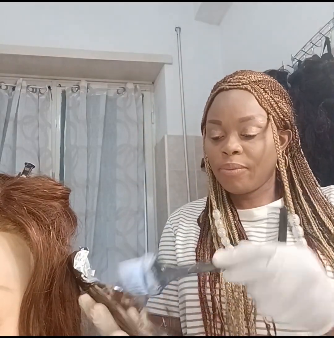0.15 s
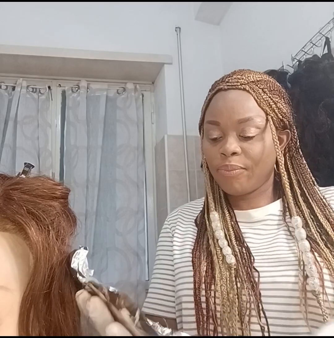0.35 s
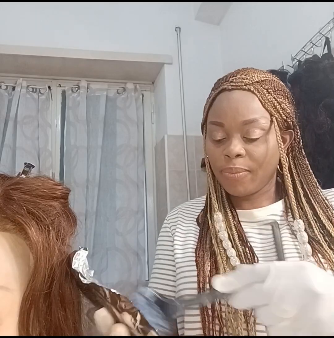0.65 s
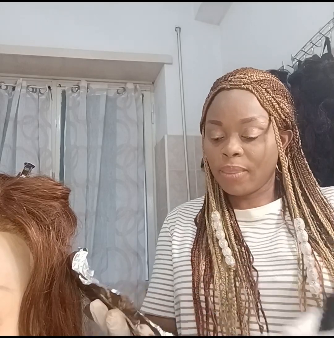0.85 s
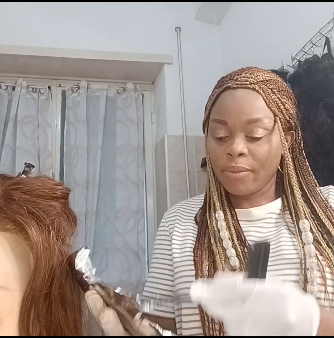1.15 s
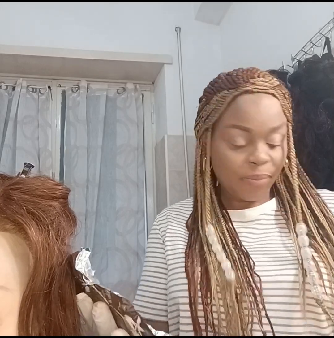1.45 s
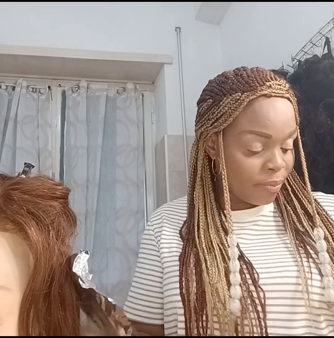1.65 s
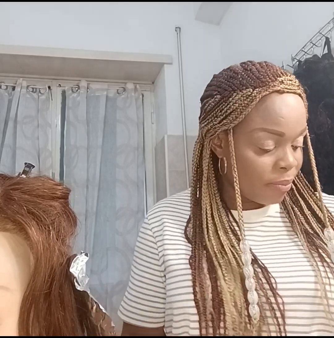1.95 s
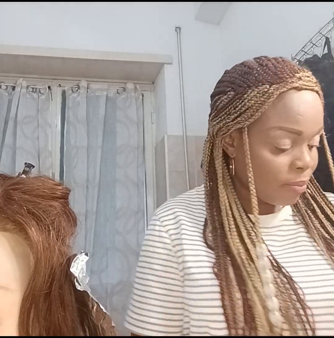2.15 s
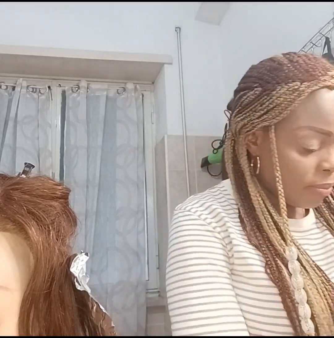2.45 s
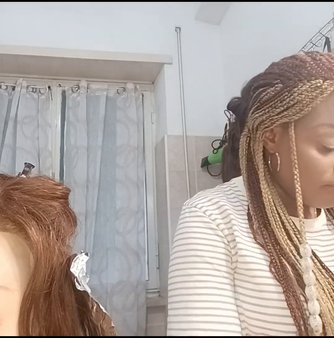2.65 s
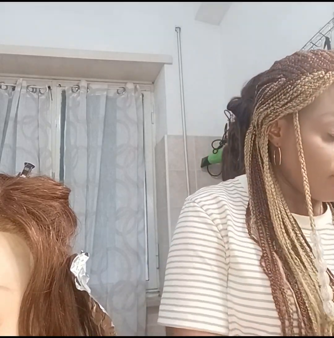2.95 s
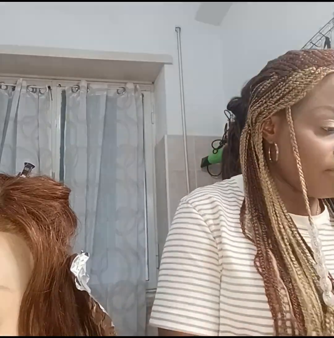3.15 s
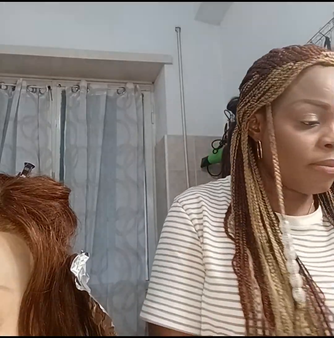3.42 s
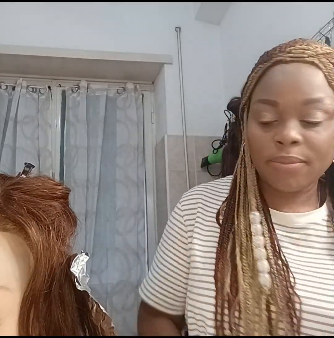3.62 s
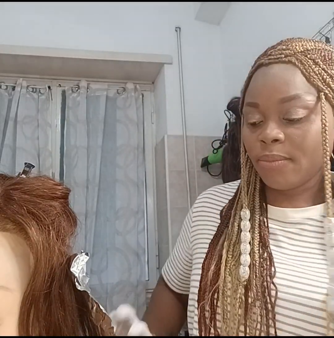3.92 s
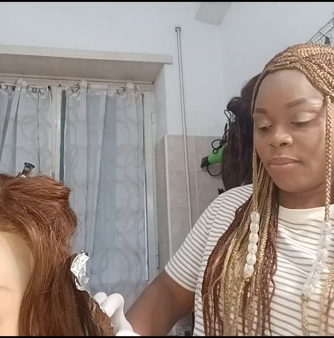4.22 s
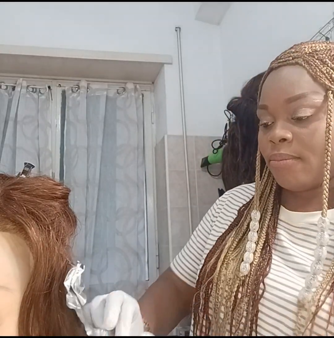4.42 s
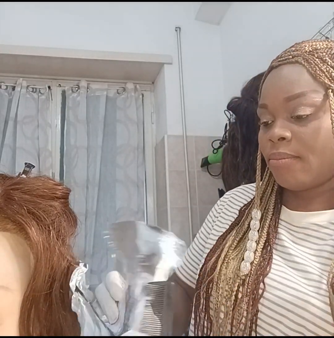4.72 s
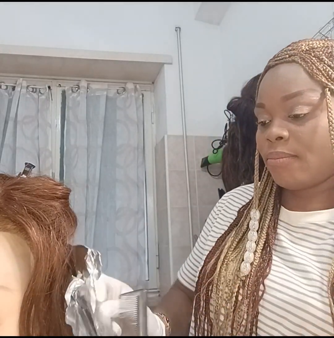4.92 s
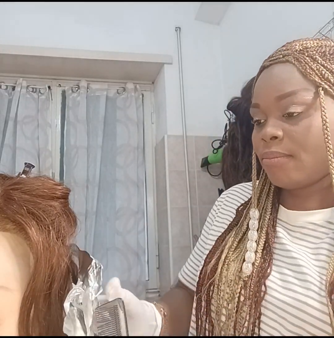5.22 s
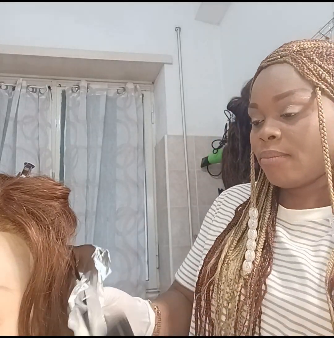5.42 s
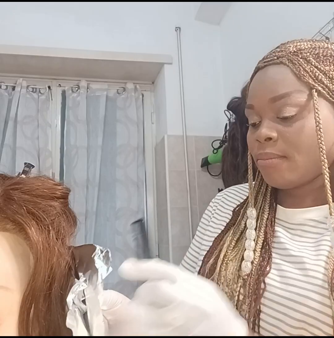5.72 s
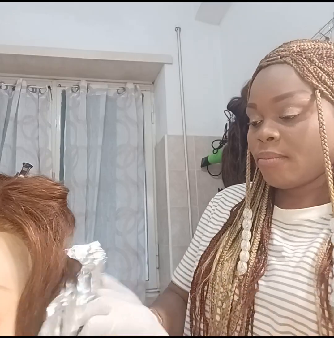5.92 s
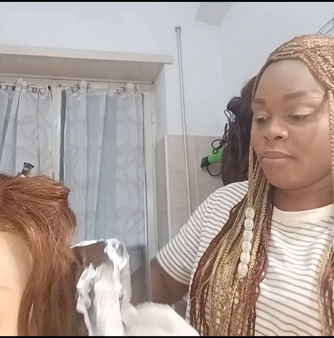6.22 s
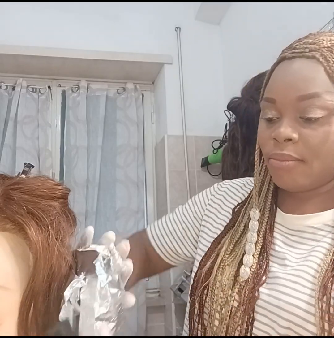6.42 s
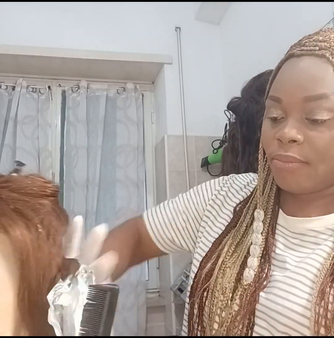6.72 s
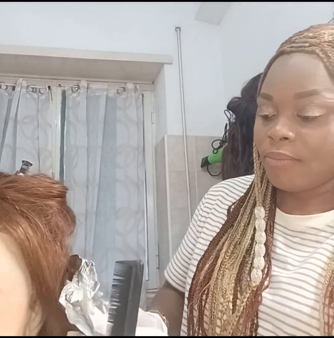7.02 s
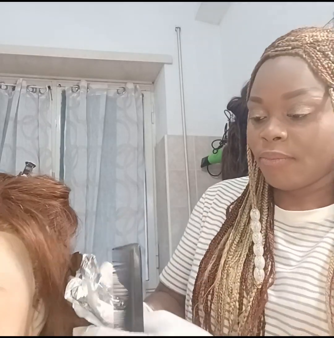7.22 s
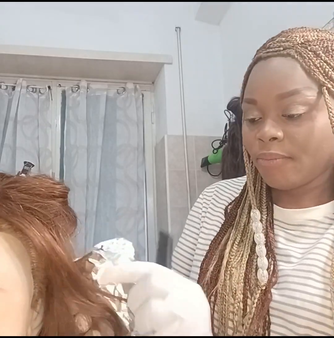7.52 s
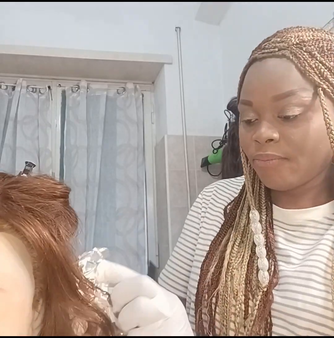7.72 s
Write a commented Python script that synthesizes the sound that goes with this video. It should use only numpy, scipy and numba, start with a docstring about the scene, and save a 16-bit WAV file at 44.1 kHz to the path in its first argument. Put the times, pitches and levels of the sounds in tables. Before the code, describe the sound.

Aluminium foil crackles and snaps in uneven bursts in a small tiled room, with dull bumps and one hard clack of a dropped brush.

```python
"""Gloved hands brush dye on hair laid in aluminium foil, fetch a new sheet and fold it, in a small tiled room.
From the start, swarms of tiny clicks and lone sharp snaps make the foil's crackle, over low hum and furniture thumps.
A box is bumped from 0.7 s on and a brush drops on a tray at 2.9 s: both are struck banks of damped sines.
From 7.6 s the folded packet adds a narrow band of clicks as it is pressed; noise tails give the walls' answer.
A phone with two ports, the right one nearer, hears it all."""
import sys
import numpy as np
from scipy import signal
from scipy.fft import rfft, irfft
from scipy.io import wavfile
from scipy.ndimage import uniform_filter1d
from numba import njit

SR = 44100
rng = np.random.default_rng(int(sys.argv[2]) if len(sys.argv) > 2 else 0)


def dump_mix(stems):
    """Bounce the given channels to the path in sys.argv[1] as a 16-bit WAV at rate SR."""
    frames = np.atleast_2d(stems).T  # one column per channel
    limited = np.clip(frames, -1, 1)  # hard clip at full scale
    pcm = np.round(limited * 32767).astype(np.int16)
    wavfile.write(sys.argv[1], SR, pcm)


N = 347067


def undb(db):
    """Gain of a level in dB."""
    return 10 ** (np.asarray(db) / 20)


def unit(x):
    """Scale to rms 1."""
    return x / np.sqrt(np.mean(x ** 2))


def colour(x, points):
    """Causal minimum-phase EQ through (Hz, dB) points, from the cepstrum of the log gain."""
    hz, db = np.transpose(points)
    grid = np.maximum(np.fft.rfftfreq(4096, 1 / SR), 1)
    log_gain = np.interp(np.log(grid), np.log(hz), db) * np.log(10) / 20
    cepstrum = irfft(log_gain)
    # fold the negative times onto the positive ones, which makes the filter causal
    cepstrum[1:2048] *= 2
    cepstrum[2049:] = 0
    impulse = irfft(np.exp(rfft(cepstrum)))
    return signal.fftconvolve(x, impulse)[:N]


def band(x, lo_hz, hi_hz):
    """Band-pass."""
    sos = signal.butter(2, [lo_hz, min(hi_hz, .45 * SR)], "band", fs=SR, output="sos")
    return signal.sosfilt(sos, x)


def decay(t, t60):
    """Exponential fade that loses 60 dB in t60 seconds."""
    return np.exp(-np.log(1000) * t / t60)


def train(s, gain):
    """One impulse at each time."""
    x = np.zeros(N)
    np.add.at(x, (np.asarray(s) * SR).astype(int), gain)
    return x


# Tone of the house hum, before its overall level: f/Hz, level/dB per Hz
HUM_TONE = [(18, -86), (30, -65), (100, -3), (149, -12.5), (319, -19), (426, -27.5), (584, -26.5),
            (988, -39.5), (6720, -33), (16000, -42)]
HUM_DB = -75  # rms over both ports


def hum():
    """Faint steady rumble and hiss of the house: coloured noise, mostly alike at both ports."""
    mid, side = (colour(rng.standard_normal(N), HUM_TONE) for _ in range(2))
    return undb(HUM_DB) * unit(mid + 0.37 * side * np.array([[1], [-1]]))


# Deep thumps through the furniture: t/s, level/dB (drive of the swell, before its rise and fade)
THUMP_HITS = [(0.0, -61), (0.26, -49), (0.69, -54), (0.839, -47.5), (1.241, -54), (2.46, -58), (2.57, -55),
              (2.902, -50.5), (3.255, -41), (3.65, -49), (3.82, -39), (4.0, -54), (5.92, -57), (6.6, -45),
              (7.44, -61), (7.6, -50)]
THUMP_RISE_S, THUMP_FADE_S = 0.013, .06  # time constants


def thumps():
    """Low rumble that swells and dies after each push on the furniture."""
    s, db = np.transpose(THUMP_HITS)
    t = np.arange(SR // 2) / SR
    push = (1 - np.exp(-t / THUMP_RISE_S)) * np.exp(-t / THUMP_FADE_S)
    swell = signal.fftconvolve(train(s, undb(db)), push)[:N]
    noise = rng.standard_normal((3, N))
    rumble = band(noise[0] + .35 * noise[1:], 94.0, 330.)  # part shared, part each port's own
    return swell * unit(band(rumble, 60., 400.))


ROOM_T60_S, ROOM_TREBLE_T60_S = 0.34, 0.18


def room(x):
    """Echo of the tiled walls for one fixed spot: alike at both ports in the bass, shorter in the treble."""
    t = np.arange(SR // 2) / SR
    noise = rng.standard_normal((3, len(t)))
    low = band(noise[0] + 0.22 * noise[1:], 74, 480.0) * decay(t, ROOM_T60_S)
    high = band(noise[1:], 600., 21000) * decay(t, ROOM_TREBLE_T60_S)
    tail = (0.71 * low + high) * np.minimum(t / 0.0098, 1)  # builds up over 9.8 ms
    tail = tail / np.sqrt(np.sum(tail ** 2, axis=1, keepdims=True))
    return signal.fftconvolve(x[None], tail, axes=1)[:, :N]


def knock(events, modes, push_s, db):
    """Blows of short push ring the modes of one small object, which radiates no deep bass."""
    s, level_db = np.transpose(events)
    t = np.arange(SR // 2) / SR
    ring = sum(undb(g) * np.sin(2 * np.pi * hz * t) * decay(t, t60) for hz, g, t60 in modes)
    push = np.hanning(int(push_s * SR) + 3)
    ring = band(np.convolve(ring, push)[:len(t)], 200.0, 12000)
    return signal.fftconvolve(train(s, undb(level_db + db)), ring / np.abs(ring).max())[:N]


# Bumps against the box: t/s, level/dB (peak of the ring)
BOX_BUMPS = [(0.694, -36), (3.256, -31), (3.647, -36.5), (3.685, -16.5), (3.764, -27), (3.84, -18.5),
             (4.074, -34), (4.998, -32.5), (5.944, -34), (6.668, -27), (7.071, -55)]
# Modes of the box: f/Hz, level/dB (relative), t60/s
BOX_MODES = [(245, -18, .04), (475, 0, .045), (620, -3, .04), (990, -2, .03), (1400, -5, .02),
             (1850, -4, .02)]


def box_bumps():
    """Each bump rings the short, dull modes of the box."""
    return knock(BOX_BUMPS, BOX_MODES, 0.00015, 0.)


# Brush landing on the tray: t/s, level/dB (before the trims of ring and crack)
BRUSH_LANDING = [(2.896, -12)]
# Ringing modes of the tray: f/Hz, level/dB (relative), t60/s
TRAY_MODES = [(677, -16, 0.6), (855, -18, 0.078), (906, -8.5, 0.17), (1710, -18, 0.066), (2040, 0, 0.13),
              (2340, 6, 0.088)]
# Very short modes of the first crack: f/Hz, level/dB (relative), t60/s
CRACK_MODES = [(800, -4, .009), (1150, -8, .008), (1550, -7, .008), (2450, 0, .009), (3250, 0, .008),
               (5150, -9, .006)]


def brush_on_tray():
    """The dropped brush makes a dry crack and sets the tray ringing; returns ring and crack."""
    ring = knock(BRUSH_LANDING, TRAY_MODES, .0001, -8.0)
    crack = knock(BRUSH_LANDING, CRACK_MODES, .0001, 4.)
    return ring, band(crack, 400., 12000.)


# Gestures that work the foil: t/s (start), rise/s (1 ms at least), hold/s, crackle level/dB,
# fade/(dB/s) (sign ignored), large folds level/dB re crackle, finest creases level/dB re crackle
FOIL_GESTURES = [(-0.004, 0.0014, 0.0067, -38.5, 201, -11.5, 4), (0.05, 0.018, 0.042, -51.5, 85, -23, 2),
                 (0.196, 0.031, 0.038, -45, 280.0, -11, 3), (0.212, 0.079, 0.072, -37, 147, -8, 5.5),
                 (0.474, 0.021, 0.019, -52.5, 57, -33, 10.5), (0.528, 0.046, 0.18, -42, 150.0, -16.5, 3.5),
                 (0.678, 0.0085, 0.032, -52.5, 90, 5.5, -10), (0.71, 0.12, 0.11, -38.5, 146, -8, 5.5),
                 (1.105, 0.15, 0.11, -38, 221, -8.5, 2.5), (1.483, 0.016, 0.019, -60.5, 200, -20, -8),
                 (1.568, 0.0072, 0.033, -54, 316, -28, 2), (1.657, 0.009, 0.046, -65.5, 100.0, -23, 6),
                 (1.76, 0.1, 0.058, -58, 262, -16, -4), (2.426, 0.042, 0.13, -34.0, 43.5, -9, 5.5),
                 (2.888, 0.084, 0.012, -41.5, 100.0, -4.5, -2),
                 (3.035, 0.064, 0.13, -46, 240.0, -17.5, 3.5), (3.208, 0.0042, 0.083, -43, -5, -14, 4.5),
                 (3.238, 0.008, 0.017, -32.5, 87, -8, 8.5), (3.535, 0.16, 0.047, -36.5, 78, -3, 4),
                 (3.664, 0.015, 0.03, -38.5, 98, -15, -4), (3.738, 0.095, 0.089, -36, 106, -6.5, 3.5),
                 (4.002, 0.037, 0.039, -53, 190, 3, -14), (4.146, 0.075, 0.075, -50.5, 118, -11, -10),
                 (4.303, 0.026, 0.003, -38, 7.5, -9.5, 1), (4.538, 0.067, 0.066, -37.5, 106, -8, 2.5),
                 (4.756, 0.026, 0.01, -43.5, 73, -7.5, 1), (4.849, 0.068, 0.084, -38, 210.0, -8.5, 0.5),
                 (5.068, 0.023, 0.052, -52, 171, -15.5, -3.5), (5.252, 0.11, 0.057, -41, 180.0, -12, 1),
                 (5.523, 0.011, 0.024, -57.5, 70.0, -14, -3), (5.692, 0.016, 0.005, -63.5, 328, -26, 0),
                 (5.854, 0.054, 0.099, -39.0, 115, -8.5, 2.5), (6.245, 0.12, 0.132, -52.5, 95, -15.5, -1),
                 (6.411, 0.2, 0.0039, -32.5, 87, -6.5, 2.5), (6.68, 0.016, 0.014, -45, 157, -6, 8),
                 (6.831, 0.015, 0.0046, -47, 138, -20.5, -2), (6.926, 0.006, 0.004, -53.5, 44, -19, -5),
                 (7.022, 0.014, 0.093, -56, 312, -9.5, 8), (7.187, 0.012, 0.07, -64.5, 30.0, -13, 3),
                 (7.249, 0.22, 0.05, -36.5, 48, -4.5, 4.5), (7.568, 0.03, 0.018, -37.5, 102, -2, 0.5),
                 (7.712, 0.049, 0.15, -39.5, 178, -12, 3.5)]
RISE_POWER, FOLDS_STEEPER = 1.83, 1.5  # swell shape; large folds swell and fade this much faster in dB
FADE_QUICKENS_DB_S2 = 75  # a fade gathers pace as the sheet settles


def handling():
    """Each gesture swells, holds and fades; returns crackle dB, and folds and fine creases in dB re crackle."""
    start, rise, hold, peak_db, fade, folds_db, fine_db = np.transpose(FOIL_GESTURES)[:, :, None]
    step = 32  # samples per envelope point
    t = np.arange(0, N, step) / SR - start
    swell = np.clip(t / np.maximum(rise, .001), .001, 1)
    since = np.maximum(t - rise - np.abs(hold), 0)
    fall_db = np.abs(fade) * since + FADE_QUICKENS_DB_S2 * since ** 2
    shape_db = 20 * RISE_POWER * np.log10(swell) - fall_db

    def together(db):
        power = np.sum(undb(peak_db + db) ** 2, axis=0)  # overlapping gestures add in power
        return np.repeat(10 * np.log10(power), step)[:N]
    crackle = together(shape_db)
    folds = together(FOLDS_STEEPER * shape_db + folds_db)
    fine = together(shape_db + fine_db)
    return crackle, folds - crackle, fine - crackle


CLICKS_PER_S, SIZE_SPREAD_DB, BIGGEST_DB = 8000, 4.5, 11.5


def swarm():
    """Random clicks, most tiny and a few larger, coming in flurries; rms 1."""
    drift = uniform_filter1d(rng.standard_normal(N), int(0.011 * SR))
    flurry = undb(2.96 * unit(drift))
    size_db = np.minimum(SIZE_SPREAD_DB * rng.exponential(size=N), BIGGEST_DB)
    size = undb(size_db) * np.sign(rng.standard_normal(N))
    return unit(flurry * size * (rng.random(N) < CLICKS_PER_S / SR))


@njit
def rings(at, hz, cycles, gain, length):
    """Damped sines, each started at its own sample and falling to 1/e in its number of cycles."""
    out = np.zeros(length)
    for k in range(len(at)):
        z, p = gain[k] + 0j, np.exp((2j * np.pi - 1 / cycles[k]) * hz[k] / SR)
        for i in range(at[k], min(length, at[k] + int(6 * cycles[k] * SR / hz[k]))):
            z *= p
            out[i] += z.imag
    return out


# Tone of the foil as the phone hears it, for facets, crackle and snaps: f/Hz, level/dB per Hz
FOIL_TONE = [(35, -62), (60, -29), (227, -9.5), (287, -22), (338, -11), (427, -20), (469, -11), (540, -12),
             (1250, -9), (2090, -4.5), (3270, -2), (6580, 0.5), (8120, -5.5), (12700, 6.5), (16000, 1)]
FACETS_PER_S, FACET_DB, FACET_CYCLES = 400, -8.5, 22.5  # level re crackle; cycles before a random 0.22-1.22


def facets(crackle_db):
    """Flat patches between the creases ring briefly, each at its own pitch, wherever the sheet is worked."""
    when, pitch, length, level = rng.random((int(FACETS_PER_S * N / SR), 4)).T
    hz = 1100. * (14000. / 1100.) ** pitch
    at = (when * N).astype(np.int64)
    tone = rings(at, hz, FACET_CYCLES * (0.22 + length), undb(12.0 * level), N)
    return undb(crackle_db + FACET_DB) * unit(colour(tone, FOIL_TONE))


POCKET_FROM_S, POCKET_DB = 7.6, -52


def pocket():
    """The folded packet resounds as it is pressed: a swarm of clicks in a narrow band."""
    pressed = np.arange(N) > POCKET_FROM_S * SR
    return undb(POCKET_DB) * pressed * unit(band(swarm(), 990.0, 1570.0))


# Lone creases giving way: t/s, level/dB (before the trims of ring and rattle)
LONE_SNAPS = [(0.2017, -23), (0.2448, -11), (0.3003, -25), (0.4953, -26), (0.5753, -13), (0.855, -8),
              (1.1463, -29.5), (1.2466, -13), (1.345, -10.5), (1.5743, -29.5), (1.611, -37), (1.665, -29.5),
              (1.712, -29), (1.7904, -34), (1.852, -28.5), (1.888, -38), (2.1081, -49.5), (2.4451, -12.5),
              (2.4983, -5), (2.755, -19), (3.2066, -14), (3.251, -3.5), (4.1579, -73), (4.238, -20),
              (4.336, -4.5), (4.6154, -11), (4.78, -25), (5.303, -39), (5.542, -24.5), (5.589, -35),
              (5.6094, -39), (5.6324, -30), (5.702, -31.5), (5.8718, -31), (5.884, -19), (5.953, -12),
              (6.029, -31), (6.196, -27.5), (6.288, -29.5), (6.332, -45), (6.3723, -33), (6.4835, -20),
              (6.753, -20), (6.8366, -21.5), (6.9353, -20), (6.998, -27), (7.0439, -30), (7.05, -31),
              (7.0908, -24), (7.193, -32), (7.251, -31), (7.279, -29), (7.2882, -23.5), (7.535, -26),
              (7.7653, -18)]
TICKS_PER_S, TICK_DB, TICK_SPREAD_DB = 45, 15, 4  # small chance snaps, level re crackle
TICK_MOST_DB = 9  # largest above TICK_DB


def snap_times(crackle_db):
    """Lone snaps plus small chance ones that follow the crackle; returns times and levels in dB."""
    when, size = rng.random((int(TICKS_PER_S * N / SR), 2)).T
    extra_db = np.minimum(-TICK_SPREAD_DB * np.log(size), TICK_MOST_DB)
    tick_db = crackle_db[(when * N).astype(int)] + TICK_DB + extra_db
    return np.hstack([np.transpose(LONE_SNAPS), [when * N / SR, tick_db]])


SNAP_RING_LO_HZ, SNAP_RING_HI_HZ = 2590, 6230  # the freed patch rings somewhere in here
SNAP_RING_DB = -28  # re snap level


def snap_rings(at, level_db):
    """The patch freed by each snap rings at a pitch of its own, falling to 1/e in 5.1 ms."""
    hz = SNAP_RING_LO_HZ + (SNAP_RING_HI_HZ - SNAP_RING_LO_HZ) * rng.random(len(at))
    return rings(at, hz, hz * 0.0051, undb(level_db + SNAP_RING_DB), N)


def snap_rattles(at, gain):
    """A snap is one sharp crack, then a short rattle of the freed crease: two noise decays."""
    t = np.arange(SR // 20) / SR
    fade = np.exp(-t / 0.0024) + 1.5 * np.exp(-t / 0.00016)
    bursts = rng.standard_normal((len(at), len(t))) * fade
    out = np.zeros(N + len(t))
    for start, g, burst in zip(at, gain, bursts):
        out[start:start + len(t)] += g * burst
    return out[:N]


def scatter(x, sheen, t60, unlike):
    """Every click leaves from another spot, so the echoes are unrelated: noise whose power trails the clicks."""
    keep = np.exp(-2 * np.log(1000) / t60 / SR)
    power = signal.lfilter([1 - keep], [1, -keep], x ** 2)
    power = uniform_filter1d(power, 132, origin=65)
    noise = rng.standard_normal((3, N))
    sides = np.array([unit(sheen(noise[0] + unlike * own)) for own in noise[1:]])
    return np.sqrt(np.maximum(power, 0)) * sides


# Large folds, middle facets, fine creases: low edge f/Hz, high edge f/Hz, gain of the part's own clicks
# re shared ones, snap level/dB, echo t60/s, echo level/dB, gain of each port's own echo noise re shared noise
SHEET_PARTS = [(270, 1340, .7, -37, 0.22, 0, 1.7), (1670, 7490, 0.7, -20, 0.13, 2, 4.3),
               (8760, 20500, 0.52, -6, 0.085, 1.5, 5.6)]
SNAP_BRIGHT_DB, BRIGHT_DB_PER_DB = -6, -0.1676  # fine-crease trim at a -29.5 dB snap; small snaps are brighter
DIRECT_DB, SNAP_DIRECT_DB = -7.5, 6  # crackle's direct share; snaps above that share


def foil():
    """Clicks and snaps excite large folds, middle facets and fine creases; returns direct sound and echo."""
    crackle_db, folds_db, fine_db = handling()
    s, level_db = snap_times(crackle_db)
    at = (s * SR).astype(np.int64)
    bright_db = SNAP_BRIGHT_DB + BRIGHT_DB_PER_DB * (level_db + 29.5)
    shared = swarm()
    near = facets(crackle_db) + pocket() + snap_rings(at, level_db)
    walls = room(near)
    for (lo_hz, hi_hz, own, snap_db, t60, echo_db, unlike), rel_db, tint_db in zip(
            SHEET_PARTS, (folds_db, 0, fine_db), (0, 0, bright_db)):
        def sheen(v):
            return band(colour(v, FOIL_TONE), lo_hz, hi_hz)
        rattles = snap_rattles(at, undb(level_db + tint_db + snap_db))
        snaps = sheen(rattles) / np.std(sheen(shared))
        clicks = unit(sheen(own * swarm() + shared))
        crackle = undb(crackle_db + rel_db) * clicks
        near = near + undb(DIRECT_DB) * (crackle + undb(SNAP_DIRECT_DB) * snaps)
        walls = walls + undb(echo_db) * scatter(crackle + snaps, sheen, t60, unlike)
    return near, walls


# Where the work sits between the ports: t/s, left minus right level/dB
SIDE_PATH = [(0.0, -3), (2.3, -2), (4.5, -0.5), (7.87, -1.5)]
LEFT_LAG = 5  # samples


def scene():
    """Direct sound reaches the right port first; walls join before panning, thumps and hum after it."""
    sheet, walls = foil()
    tray, crack = brush_on_tray()
    box = box_bumps()
    near = sheet + crack + tray + box
    walls = walls + room(undb(-12) * tray + undb(7.5) * crack) + room(undb(-5) * box)
    at_ports = np.array([np.roll(near, LEFT_LAG), near]) + walls
    pan_db = np.interp(np.arange(N) / SR, *np.transpose(SIDE_PATH))
    return at_ports * undb(np.array([pan_db, -pan_db]) / 2) + thumps() + hum()


TOP_HZ = 15900


def record(dry):
    """The phone cuts the top with a steep low-pass."""
    return signal.sosfilt(signal.ellip(10, .2, 70, TOP_HZ, fs=SR, output="sos"), dry)


dry = scene()
out = record(dry)
dump_mix(out)
```